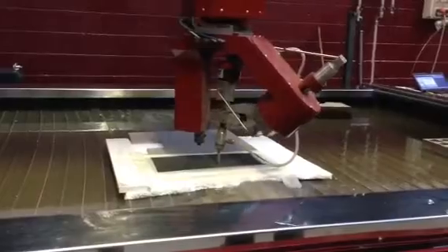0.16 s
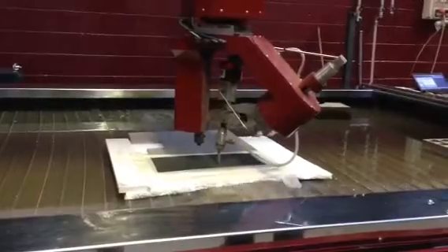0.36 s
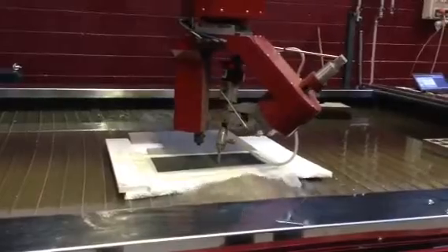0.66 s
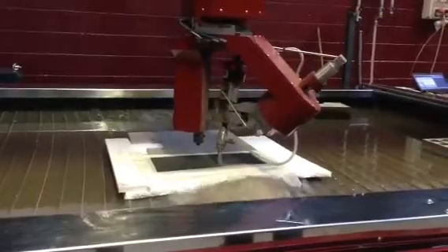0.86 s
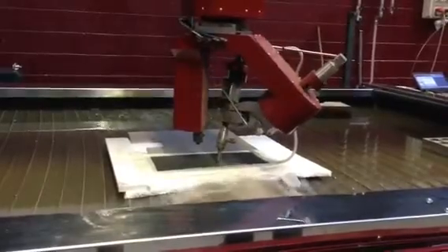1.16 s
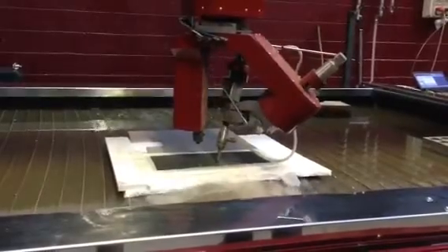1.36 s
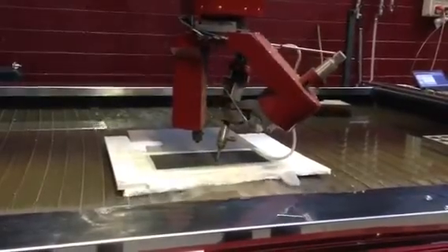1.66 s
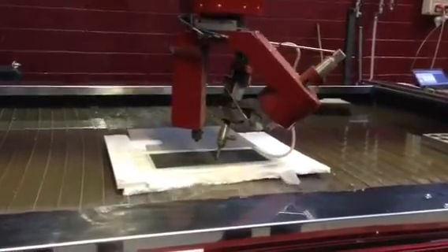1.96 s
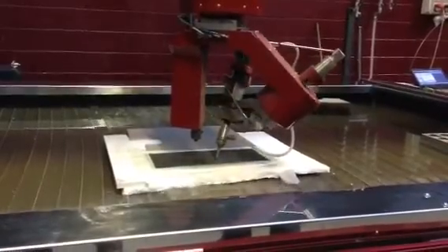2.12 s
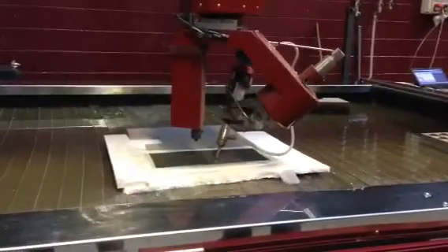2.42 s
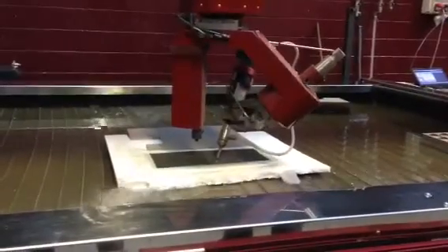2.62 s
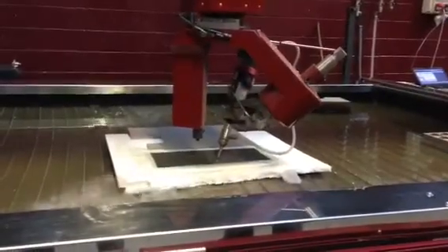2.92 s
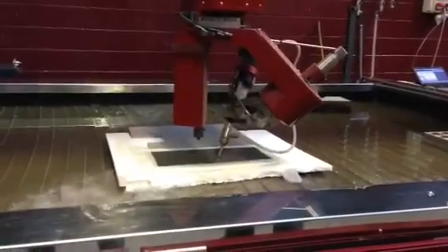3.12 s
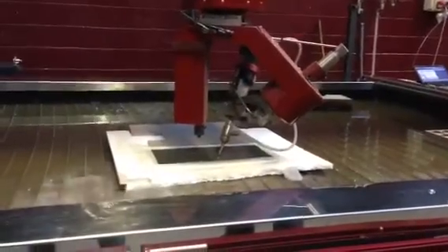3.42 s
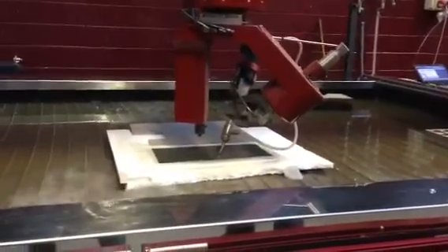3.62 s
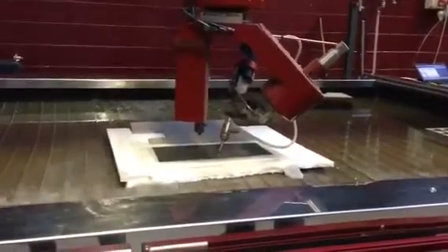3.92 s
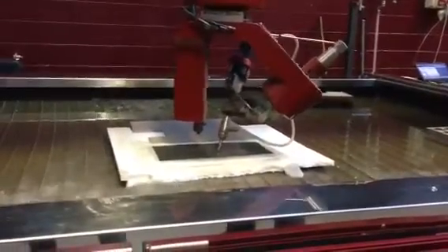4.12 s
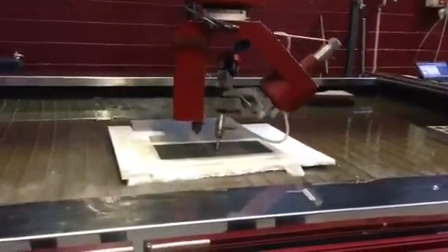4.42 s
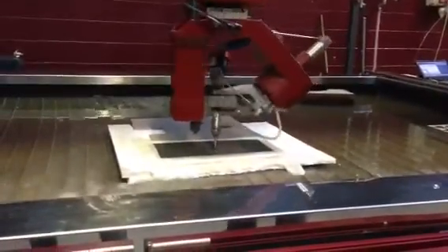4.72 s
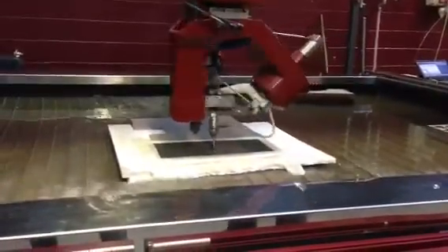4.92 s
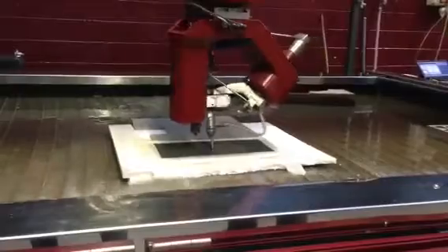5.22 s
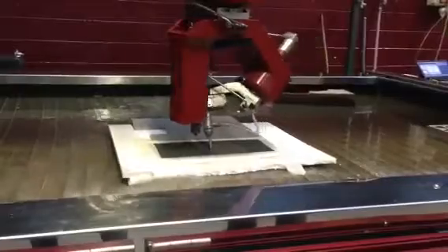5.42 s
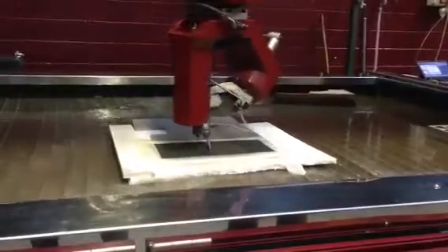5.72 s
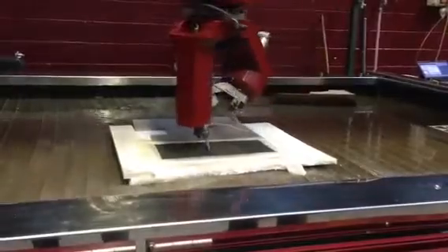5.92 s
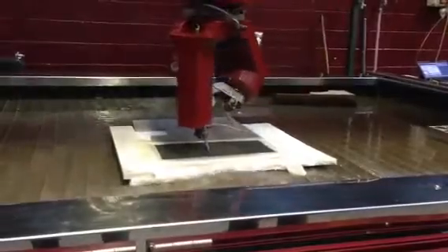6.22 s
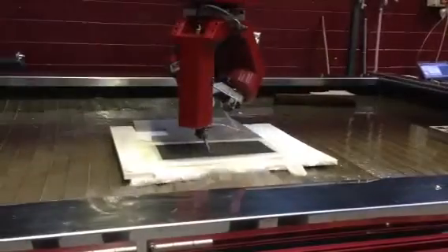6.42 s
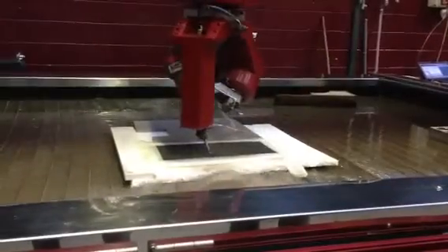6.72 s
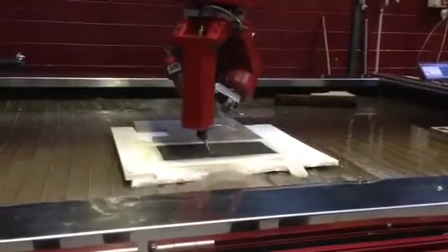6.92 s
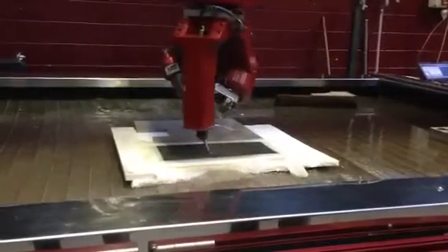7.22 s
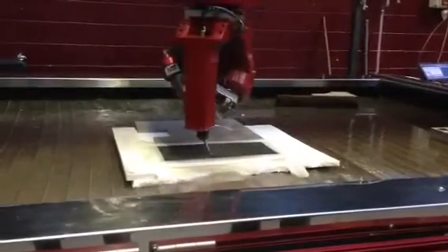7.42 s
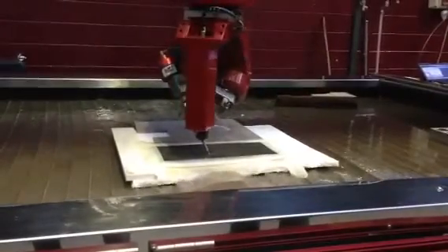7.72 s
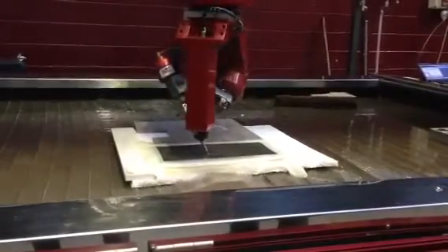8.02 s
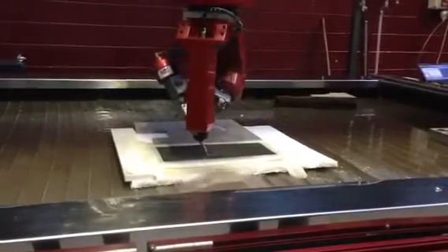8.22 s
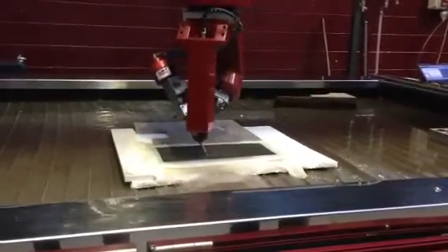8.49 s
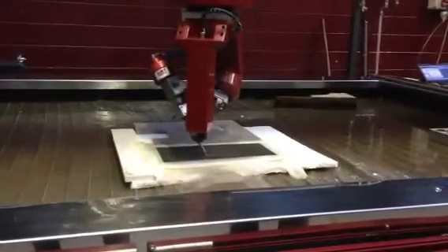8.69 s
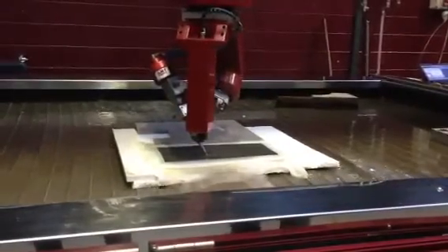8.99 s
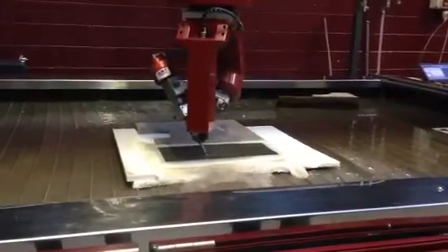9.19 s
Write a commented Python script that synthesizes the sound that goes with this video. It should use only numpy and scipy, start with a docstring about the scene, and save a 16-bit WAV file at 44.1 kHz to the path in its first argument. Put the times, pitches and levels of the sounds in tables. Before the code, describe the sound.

A high-pressure water jet runs without pause for about 9.4 seconds, captured by one microphone in a workshop, the same in both channels. Bright, grainy treble hiss dominates, opening with a gust near 0.3 s, then sinking until 1.3 s as the panel muffles it. By 1.6-2.2 s it returns strongly with coarse spray and fine mist, fluttering in small puffs and lulls, including a sharp puff around 3.1 s. Gritty tearing and sizzle from the cut grow gradually fuller. Far below are a faint steady low pump hum with its octave and churning, gurgling tank water. A hollow moan jumps up in pitch near 2.7 s and slides down by 3.5 s. Soft thumps come at 1.2, 2.9 and 4.8 s, the strongest at 5.6 s within a long rumble. The moan swells and glides again from 6.3 s, strongest near 7 s, with more thumps until 8.8 s; hissing continues to the end.

```python
"""A waterjet cuts a thick panel over a tank of water, heard by one microphone in a workshop.
Two steady pump tones, low churning water and noise from the cut run throughout, under the jet's treble hiss.
The hiss opens with a gust, sinks until 1.3 s as the panel muffles it, then returns strongly with the spray.
A moan jumps up in pitch near 2.7 s and slides down; the strongest thump comes near 5.6 s, in a long rumble.
From 6.3 s the moan swells and glides again. Noises are shaped random spectra; tones and thumps are sines."""
import sys
import numpy as np
from scipy import signal
from scipy.io import wavfile
from scipy.ndimage import uniform_filter1d

SR = 44100
rng = np.random.default_rng(int(sys.argv[2]) if len(sys.argv) > 2 else 0)


def dump(signal):
    """Clip the signal to [-1, 1] and save it as 16-bit WAV at the path in sys.argv[1]."""
    limited = np.clip(np.atleast_2d(signal).T, -1, 1)
    pcm = np.round(limited * 32767).astype(np.int16)
    wavfile.write(sys.argv[1], SR, pcm)


N = 412335  # length in samples


def gain_of(db):
    """Turns decibels into a factor for the sound pressure."""
    return 10 ** (np.asarray(db) / 20)


def evened(x):
    """Scales to an average strength (rms) of 1."""
    return x / np.sqrt(np.mean(x ** 2) + 1e-20)


def columns(rows, t):
    """Reads every curve of a table at the times t, with straight lines between its rows."""
    s, *values = np.transpose(rows)
    return [np.interp(t, s, v) for v in values]


def grid(size):
    """The frequencies (Hz) and frame times (s) of short-time spectra, four overlapping frames deep."""
    hop = size // 4
    frame_times = np.arange(N // hop + 5) * hop / SR
    return np.fft.rfftfreq(size, 1 / SR), frame_times


def wander(count, seconds):
    """A random curve of rms 1, smoothed twice so that it changes over the given time."""
    size = max(round(seconds * SR), 1)
    smooth = uniform_filter1d(rng.standard_normal(count), size)
    return evened(uniform_filter1d(smooth, size))


def blotches(hz, t, wide_hz, long_s):
    """A random field of rms 1 over frequency and time, in patches of the given size."""
    wide = max(round(wide_hz / hz[1]), 1)
    long = max(round(long_s / t[1]), 1)
    field = rng.standard_normal((len(t), len(hz))).T
    field = uniform_filter1d(field, wide, axis=0)
    return evened(uniform_filter1d(field, long, axis=1))


def colour(points, hz):
    """A fixed spectrum of unit power, drawn through the points and almost silent beyond its ends."""
    f, db = np.transpose(points)
    shape = gain_of(np.interp(np.log(hz + 1), np.log(f + 1), db, left=-80, right=-80))
    return (shape / np.linalg.norm(shape))[:, None]


def hump(hz, centre_hz, width_hz, steep):
    """A resonance of unit power whose centre moves."""
    shape = 1 / (1 + ((hz[:, None] - centre_hz) / width_hz) ** 2) ** steep
    return shape / np.linalg.norm(shape, axis=0)


def blend(hz, colours, levels_db):
    """Mixes coloured noises: unrelated noises add by power."""
    powers = [(colour(c, hz) * gain_of(db)) ** 2 for c, db in zip(colours, levels_db)]
    return np.sqrt(sum(powers))


STANDING_DB = .8  # average size of the slowly shifting comb of room echoes


def rush(size, magnitude, patch_hz, patch_s, patchy_db, ripple_db):
    """Noise from random short-time spectra, with drifting patches and the fine ripple of room echoes."""
    hop = size // 4
    hz, t = grid(size)
    a, b = rng.standard_normal((len(t), len(hz), 2)).T
    patches_db = patchy_db * blotches(hz, t, patch_hz, patch_s)
    fine_db = ripple_db * blotches(hz, t, 60, .07)
    standing_db = STANDING_DB * blotches(hz, t, 90, 1.2)
    loudness = gain_of(patches_db + fine_db + standing_db)
    spectra = (a + 1j * b) * magnitude(hz, t) * evened(loudness)
    noise = signal.istft(spectra, nperseg=size, noverlap=size - hop)[1][:N]
    return noise * np.sqrt(1.5)  # makes up for power lost where random frames overlap


# The pump as heard past the moving gantry, before small wavers: start_s, first_tone_db, octave_db
PUMP_LEVELS = [(0, -42, -46), (1.1, -41, -46), (1.6, -38, -42.5), (2.3, -41, -47.5), (3, -43, -42.5),
               (3.6, -42.5, -47), (4.2, -45, -47), (4.9, -50, -46.5), (5.6, -40, -42.5), (6.2, -42, -47),
               (6.6, -47.5, -57), (7.3, -43.5, -44.5), (8.1, -44, -52), (8.3, -51, -45), (8.8, -42, -43.5),
               (9.35, -42, -45)]
PUMP_HZ = 224.15


def pump():
    """A piston tone and its octave, each a sine wavering a little in level and phase."""
    t = np.arange(N) / SR
    turns = PUMP_HZ * t + 0.062 * wander(N, 0.21)
    first_db, octave_db = columns(PUMP_LEVELS, t)
    first_db = first_db + 2.1 * wander(N, 0.032)
    octave_db = octave_db + 1.8 * wander(N, .05)
    octave_turns = 2 * turns + 0.027 * wander(N, 0.047) + rng.random()
    first = gain_of(first_db) * np.sin(2 * np.pi * turns)
    octave = gain_of(octave_db) * np.sin(2 * np.pi * octave_turns)
    return np.sqrt(2) * (first + octave)  # a sine's rms is 1 / sqrt(2) of its peak


# The spent jet in the tank: start_s, slosh_db, gurgle_db, churn_db
TANK_LEVELS = [(0, -38.5, -42.5, -39.5), (.4, -47, -48, -40), (.75, -53, -54, -40.5), (1.1, -47, -46, -39),
               (1.17, -44, -42, -35), (1.55, -37, -39.5, -35.5), (1.95, -38, -43, -34),
               (2.15, -39, -43, -38), (2.4, -42, -49, -39), (3.05, -41, -40.5, -36), (3.45, -40, -44, -35),
               (3.75, -40, -51, -36), (4.1, -42, -42, -37), (4.22, -42, -49, -40.5), (4.4, -35, -51, -38.5),
               (5.6, -39, -50, -39.5), (6.35, -42.5, -50, -38.5), (6.45, -39, -42.5, -37),
               (6.9, -40, -37, -38), (7.5, -42, -45, -38), (7.65, -47, -44.5, -41.5),
               (8.2, -41.5, -44, -41), (8.8, -38.5, -37.5, -40.5), (9.35, -40.5, -42, -41)]
# The air pocket under the panel, moaning as its pitch glides with the cut: start_s, pitch_hz, level_db
MOAN_GLIDE = [(0, 280, -60), (1.5, 260, -57), (2.4, 298, -61), (2.7, 435, -44), (2.95, 410, -40),
              (3.15, 385, -45), (3.3, 340, -44), (3.45, 292, -44), (4.2, 266, -46), (5.2, 280, -49),
              (6.3, 260, -43.5), (6.48, 305, -38), (6.55, 320, -45), (6.85, 250, -46), (6.95, 270, -39),
              (7.05, 300, -34), (7.15, 312, -42), (7.25, 343, -48), (7.38, 300, -43), (7.65, 277, -40),
              (8, 264, -39), (8.3, 292, -43), (9.35, 294, -41)]
# The boom of the tank walls: start_s, level_db
BOOM_LEVELS = [(0, -58), (1, -63), (2.5, -67), (3.1, -45), (3.8, -52.5), (4.5, -51), (5.3, -46),
               (6.3, -55.5), (7, -57), (9.35, -58)]
# Noise colours of the water, lowest first; only the shape counts: pitch_hz, density_db (per Hz)
RUMBLE_COLOUR = [(20, -28), (45, -25), (70, 9), (105, -2), (140, -2)]
SLOSH_COLOUR = [(90, -51), (130, -9), (190, -3.5), (240, -2.5), (290, -22)]
GURGLE_COLOUR = [(250, 2.5), (310, 8.5), (360, 6), (420, -9), (490, 9)]
CHURN_COLOUR = [(380, -5.5), (490, -6.5), (700, -7), (930, -9.5), (1150, -53)]
BOOM_HZ = 127
RUMBLE_DB, ROLL_S = -65, 0.32  # rumble between surges, and how long it rolls on either side of one
LUMPY_DB = 3  # average size of the short lumps in the rumble


def tank():
    """Lumpy low water noise, with narrow noise bands for the moan of trapped air and the wall boom."""
    def magnitude(hz, t):
        pitch_hz, moan_db = columns(MOAN_GLIDE, t)
        moan = gain_of(moan_db) * hump(hz, pitch_hz, 24, 1.5)
        boom = gain_of(columns(BOOM_LEVELS, t)[0]) * hump(hz, BOOM_HZ * np.ones(len(t)), 27, 1.0)
        rolls_db = [roll_db * np.exp(-((t - s) / ROLL_S) ** 2) for s, *_, roll_db in SURGES]
        lumps_db = LUMPY_DB * evened(uniform_filter1d(rng.standard_normal(len(t)), size=5))
        rumble_db = RUMBLE_DB + np.max(rolls_db, axis=0) + lumps_db
        colours = RUMBLE_COLOUR, SLOSH_COLOUR, GURGLE_COLOUR, CHURN_COLOUR
        water = blend(hz, colours, [rumble_db] + columns(TANK_LEVELS, t))
        return np.hypot(np.hypot(moan, boom), water)
    return rush(2048, magnitude, 200, 0.12, 1.37, 1.0)


# Surges of water thumping the tank: start_s, level_db (nominal), pitch_hz (at the start),
# roll_db (lift of the tank's rumble around the surge)
SURGES = [(1.199, -36.5, 88.8, 13), (1.379, -48, 116, 8), (1.499, -42, 140, 19.5), (2.919, -33, 102, 2),
          (3.499, -44, 120, 5), (4.298, -38, 133, 4), (4.769, -36, 110, 16), (5.559, -27, 130, 18.5),
          (6.269, -41, 56.5, 8), (7.469, -38, 91, 7), (7.9, -38, 100, 7), (8.339, -38, 91.5, 18),
          (8.799, -49, 140, 14)]


def thumps():
    """Each surge is a short burst of low cycles that rise in pitch like a large bubble."""
    out, t = np.zeros(N), np.arange(0, .12, 1 / SR)
    for s, db, hz, _ in SURGES:
        swell = t / 0.01 * np.exp(1 - t / 0.0085)  # crests after 8.5 ms, then fades
        thump = gain_of(db) * swell * np.sin(2 * np.pi * hz * t * (1 + 5.2 * t))
        part = out[round(s * SR):][:len(t)]
        part += thump[:len(part)]
    return out


# Gusts of spray out of the cut and brief lulls (negative lifts):
# centre_s, hiss_lift_db, kerf_lift_db, half_length_s; each noise takes all or a share of its lift
GUST_LIFTS = [(0.27, 7.5, 3.5, 0.13), (0.91, 2.5, 3.5, 0.039), (0.982, -4, -3, .04), (1.768, 2, 6, 0.088),
              (1.936, -2, -1, .05), (2.2, 0.5, 1.5, 0.099), (2.377, -4, -1, .04), (2.833, 1.5, 4, .05),
              (2.9, 1, -4, 0.05), (2.982, 2, 3, 0.09), (3.134, 6.5, -1, 0.018), (3.23, 5, 0, 0.044),
              (3.57, 1.5, 2, .03), (3.655, -3, -1.5, 0.041), (4.005, -0.5, 4, 0.084), (4.2, -3, 0, 0.076),
              (4.638, 2, 1.5, 0.019), (5.184, 3, 0.5, .06), (5.648, 2, 0.5, .04), (5.758, -2.5, 0, 0.037),
              (6.812, 1.5, 4, 0.033), (7.048, -3, 1, 0.034), (7.187, 2.5, -1, 0.025),
              (7.463, 1.5, -2, 0.02), (7.587, 1.5, 3, 0.026), (7.64, -1.5, -6, 0.027),
              (7.792, -2.5, -5, 0.017), (7.894, 2.5, -1.5, 0.12), (8.125, 0, -2, 0.036),
              (8.222, 0, 2, 0.04), (8.62, 3.5, 0, 0.047), (8.755, 0.5, 4, 0.07), (8.91, 2.5, 1, 0.038),
              (9.29, 0, 1, .04)]
GUST_EDGE = 2  # how squarely a gust starts and stops


def gusts(t):
    """The lift in dB of hiss and kerf, one bell curve in time for each gust or lull."""
    s, hiss_db, kerf_db, half = np.transpose(GUST_LIFTS)
    bells = np.exp(-abs((t - s[:, None]) / half[:, None]) ** GUST_EDGE)
    return np.array([hiss_db, kerf_db]) @ bells


# Negative changes below are dips, positive ones lifts; all but the upper band are then deepened.
# A moving narrow band near 4.6 kHz, later 5.7 kHz, that mostly dips: start_s, centre_hz, change_db
LOWER_BAND = [(0, 4670, -2), (.7, 4550, -4), (1.3, 4600, -0.5), (1.6, 4600, -2), (1.9, 4680, -8),
              (2.2, 4620, -10), (2.7, 4800, -10), (3.3, 4550, 1), (4.6, 4550, -1.5), (6, 4700, -0.5),
              (6.7, 4800, -1), (7.2, 5600, -2.5), (8, 5640, -1.5), (9.35, 5760, -3)]
# A second band, higher in the hiss: start_s, centre_hz, change_db
UPPER_BAND = [(0, 6700, 2.5), (1.5, 6840, -6), (2.3, 6800, -1.5), (3.5, 6660, -1.5), (4.3, 6700, 0.5),
              (4.8, 6760, 5.5), (5.3, 6900, -1.5), (6.1, 7700, -3), (6.8, 8000, 0), (7.5, 8100, -4),
              (8.6, 8000, -3), (9.35, 7800, 0)]
# A thin fixed notch where an echo off the table cancels the hiss: start_s, change_db
ECHO_NOTCH = [(0, -5), (.5, -9), (1, -2), (2.3, -2), (2.7, -5), (3.3, -5), (4.5, -4), (5.7, -5), (6.4, -3),
              (6.9, 0), (9.35, 0)]
# Brief dips in narrow bands of the noise between 2.8 and 5.5 kHz:
# centre_s, centre_hz, change_db, half_width_hz, half_length_s
BRIEF_DIPS = [(2.42, 2850, -5, 300, 0.2), (2.65, 3970, -5, 200, 0.084), (4.45, 3100, -4, 200, 0.11),
              (7.55, 5500, -3, 250, .2)]
NOTCH_HZ, NOTCH_WIDTH_HZ = 4250, 130
DEEPEN, RAGGED = 1.5, .6  # average factor on the changes, and its random spread in small patches


def hollow(hz, t):
    """The gain of the two moving bands, the echo notch and the brief dips."""
    f = hz[:, None]
    dips_db = columns(ECHO_NOTCH, t)[0] * np.exp(-((f - NOTCH_HZ) / NOTCH_WIDTH_HZ) ** 2)
    for s, mid_hz, db, wide_hz, half in BRIEF_DIPS:
        dips_db = dips_db + db * np.exp(-((f - mid_hz) / wide_hz) ** 2 - ((t - s) / half) ** 2)
    centre_hz, lower_db = columns(LOWER_BAND, t)
    centre_hz = centre_hz + 120 * np.sin(2 * np.pi * 3.5 * t) * np.sin(2 * np.pi * 1.4 * t)  # the band wavers
    dips_db = dips_db + lower_db * np.exp(-((f - centre_hz) / 260) ** 2)
    upper_hz, upper_db = columns(UPPER_BAND, t)
    upper = gain_of(upper_db * np.exp(-((f - upper_hz) / 350) ** 2))
    return upper * gain_of(dips_db * (DEEPEN + RAGGED * blotches(hz, t, 150, 0.077)))


# Water and grit tearing through the kerf (the cut slot), before gusts and dips:
# start_s, roar_db, rasp_db, sizzle_db, thin_sizzle_db
KERF_LEVELS = [(0, -36.5, -36, -34.5, -42), (.8, -38.5, -34, -33.5, -41.5), (1.3, -39.5, -35, -34.5, -35),
               (1.7, -37, -36.5, -33, -53), (2.2, -40.5, -38.5, -33.5, -31.5),
               (2.45, -38.5, -38, -37.5, -28.5), (2.75, -34, -38, -37, -33), (3.2, -35.5, -37, -32, -29.5),
               (3.7, -34, -37, -30.5, -36.5), (3.85, -33.5, -34, -33, -29.5),
               (4.3, -32.5, -32.5, -33, -30.5), (4.85, -31, -34.5, -33.5, -33),
               (5.3, -30.5, -33.5, -32, -29.5), (6.4, -32, -31.5, -29.5, -28.5),
               (7.0, -35.5, -34, -31.5, -31), (7.5, -35.5, -33.5, -30.5, -33),
               (7.65, -38, -31.5, -29.5, -32.5), (8.1, -36.5, -36, -30, -34.5),
               (8.45, -35.5, -34.5, -30.5, -32.5), (8.8, -35, -34, -30.5, -35),
               (9.35, -34.5, -34, -31, -31)]
# A narrow ring of the slot, coming and going: start_s, pitch_hz, level_db
SLOT_RING = [(0, 2110, -40), (.38, 2160, -35), (.43, 2100, -50), (1.3, 2080, -43), (1.45, 2130, -33),
             (1.8, 2000, -36), (2.0, 2030, -41), (2.28, 2000, -33), (2.36, 1950, -44), (3.7, 1970, -61),
             (3.85, 1930, -37), (4.5, 1900, -36.5), (4.9, 1970, -42), (5.5, 1900, -36), (6.2, 2100, -42),
             (6.6, 2150, -39), (7.3, 2050, -50), (8.2, 2100, -41), (9.35, 2020, -35)]
# Noise colours of the kerf, lowest first; only the shape counts: pitch_hz, density_db (per Hz)
ROAR_COLOUR = [(750, -24), (1000, -5), (1300, -4), (1800, -3), (2200, -7.5)]
RASP_COLOUR = [(1600, -69), (1950, -1), (2250, 1.5), (2600, 4), (3100, -13.5)]
SIZZLE_COLOUR = [(2300, -20), (2800, 5), (3300, 6.5), (4000, 4), (4600, -5)]
THIN_COLOUR = [(3600, -24), (4200, 1.5), (5000, 0.5), (5700, -1), (6600, -5.5)]


def kerf(dips):
    """Broad noisy bands that swell as the slot opens towards the listener; gusts lift the sizzle most."""
    def magnitude(hz, t):
        roar_db, rasp_db, sizzle_db, thin_db = columns(KERF_LEVELS, t)
        gust_db = gusts(t)[1]
        levels_db = (roar_db + 0.1 * gust_db, rasp_db + 0.9 * gust_db,
                     sizzle_db + gust_db, thin_db + 0.72 * gust_db)
        bands = blend(hz, (ROAR_COLOUR, RASP_COLOUR, SIZZLE_COLOUR, THIN_COLOUR), levels_db)
        ring_hz, ring_db = columns(SLOT_RING, t)
        ring = gain_of(ring_db) * hump(hz, ring_hz, 106, 0.99)
        return np.hypot(ring, bands * dips)
    flutter_db = 0.77 * wander(N, 0.016)
    return rush(1024, magnitude, 350, .07, 0.79, 2.6) * evened(gain_of(flutter_db))


# The jet leaving the nozzle, muffled while it bites into the panel, before gusts and dips:
# start_s, level_db, centre_hz
JET_HISS = [(0, -21.5, 10700), (.36, -22.5, 11000), (.48, -25.5, 11200), (.95, -27.5, 11000),
            (1.3, -29.5, 10900), (1.6, -20.5, 11400), (2.1, -18.5, 10750), (2.6, -20, 11400),
            (3.2, -22.5, 11400), (3.6, -21.5, 11200), (4.25, -23, 10500), (4.8, -22, 11050),
            (5.2, -21.5, 10350), (6.0, -18.5, 10860), (6.7, -18.5, 10570), (7.8, -19, 10900),
            (8.4, -20.5, 10500), (9.35, -22, 10600)]
# Spray thrown off the panel as the head tilts, before gusts and dips: start_s, coarse_db, mist_db
SPRAY_LEVELS = [(0, -31, -35), (.4, -27, -43), (.6, -35, -36), (1.0, -35.5, -37), (1.45, -28, -25),
                (1.75, -22.5, -25.5), (2.5, -21, -25), (2.9, -23, -30), (3.15, -23, -25), (4.3, -25, -25.5),
                (4.85, -27, -25), (5.2, -26.5, -22.5), (6.2, -26, -27.5), (7.5, -25, -24), (8.6, -24, -24),
                (9.35, -23, -24)]
# Centre of the coarse spray, shifting as the head leans: start_s, centre_hz
COARSE_CENTRE = [(0, 7600), (1.6, 7840), (2.2, 7800), (2.7, 7100), (3.3, 8100), (4.6, 7600), (5.3, 7000),
                 (6, 7900), (7.5, 7600), (9.35, 7860)]
# Noise colour of the fine mist; only the shape counts: pitch_hz, density_db (per Hz)
MIST_COLOUR = [(11500, -1), (12800, -1), (13800, -3.5), (14500, 1), (15500, -6)]


def jet(dips):
    """Turbulent hiss, coarse spray and fine mist, sputtering as grit and air feed unevenly."""
    def magnitude(hz, t):
        level_db, centre_hz = columns(JET_HISS, t)
        coarse_db, mist_db = columns(SPRAY_LEVELS, t)
        coarse_hz = columns(COARSE_CENTRE, t)[0]
        gust_db = gusts(t)[0]
        hiss = gain_of(level_db + gust_db) * hump(hz, centre_hz, 2730, 2.1)
        coarse = gain_of(coarse_db + 0.5 * gust_db) * hump(hz, coarse_hz, 2140, 1.19)
        mist = gain_of(mist_db + 0.53 * gust_db) * colour(MIST_COLOUR, hz)
        return np.sqrt(hiss ** 2 + coarse ** 2 + mist ** 2) * dips
    sputter_db = .45 * wander(N, .008) + .7 * wander(N, .0006)  # flutter and single droplets
    return rush(1024, magnitude, 1500, .025, 1.15, 3.7) * evened(gain_of(sputter_db))


def scene():
    """All sources reach one microphone, so both channels are alike; jet and kerf share the same dips."""
    dips = hollow(*grid(size=1024))
    mono = pump() + tank() + thumps() + kerf(dips) + jet(dips)
    return np.array([mono, mono])


EDGE_HZ = 15000


def record(dry):
    """The band limit of the recorder: a low-pass filter that removes the treble above the edge."""
    low_pass = signal.firwin(1023, EDGE_HZ, window=("kaiser", 10), fs=SR)
    return signal.oaconvolve(dry, low_pass[None], "same")


dry = scene()
out = record(dry)
dump(out)
```